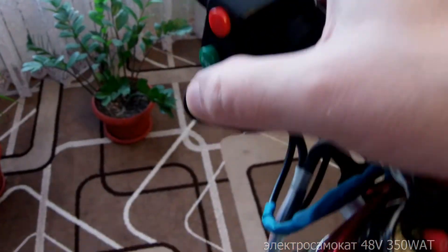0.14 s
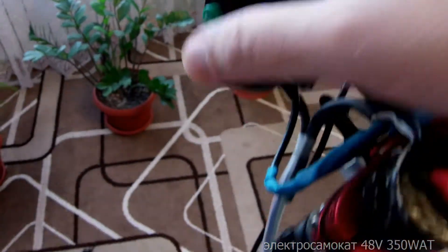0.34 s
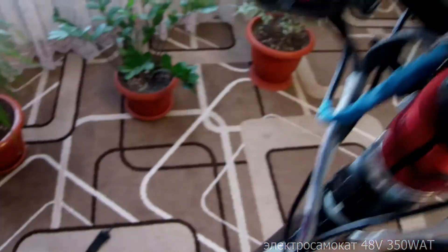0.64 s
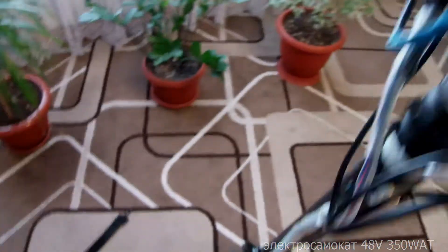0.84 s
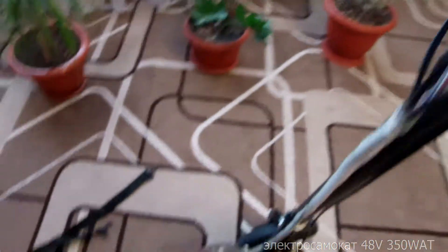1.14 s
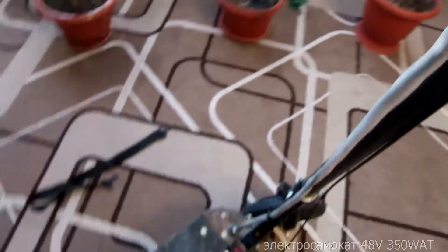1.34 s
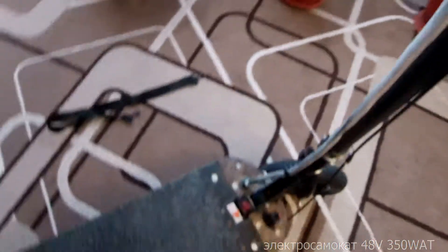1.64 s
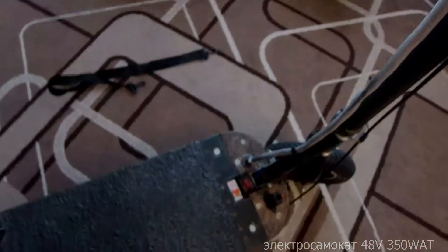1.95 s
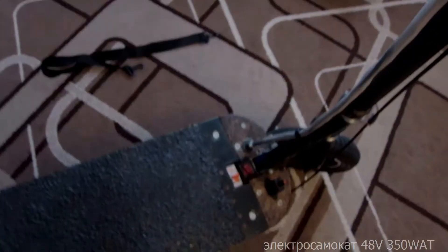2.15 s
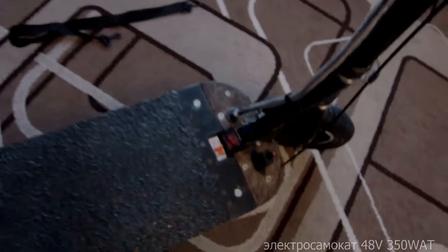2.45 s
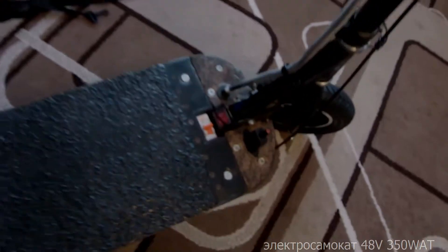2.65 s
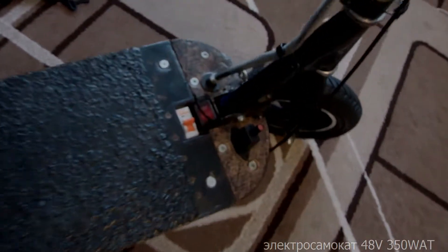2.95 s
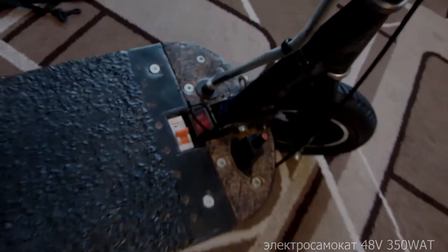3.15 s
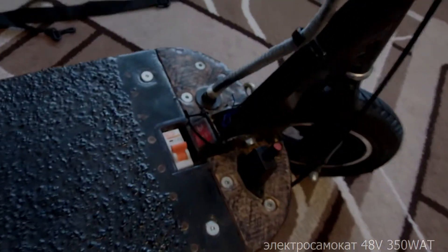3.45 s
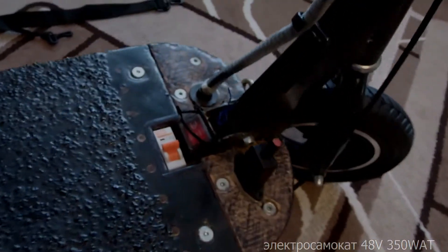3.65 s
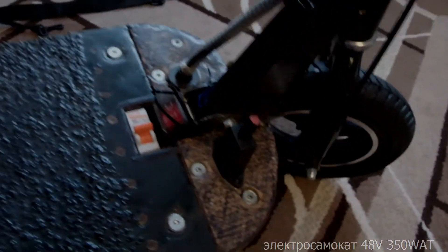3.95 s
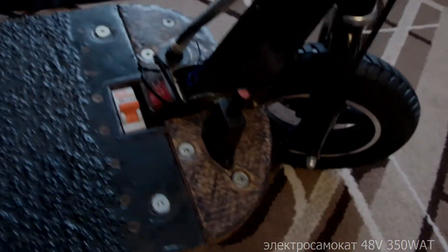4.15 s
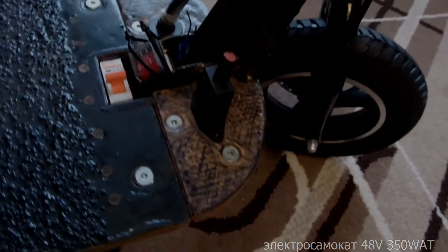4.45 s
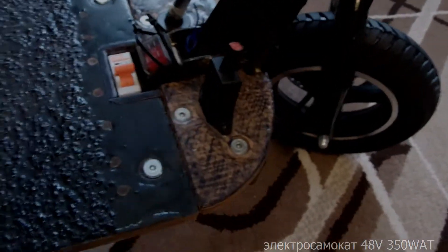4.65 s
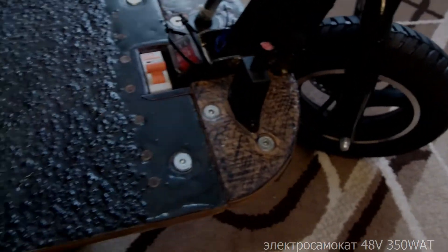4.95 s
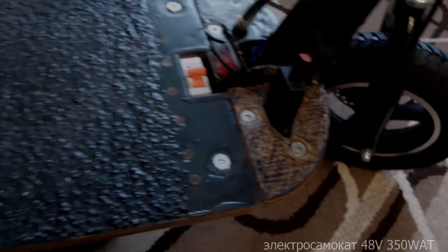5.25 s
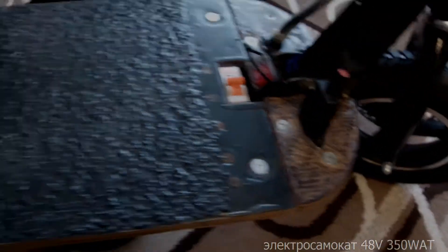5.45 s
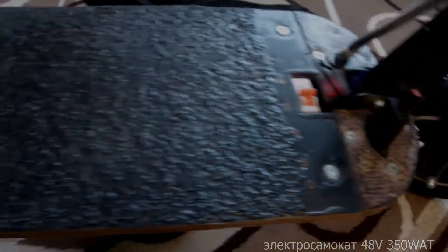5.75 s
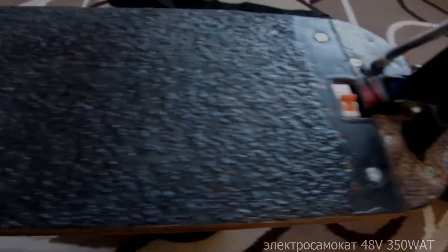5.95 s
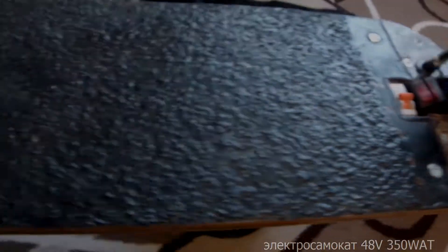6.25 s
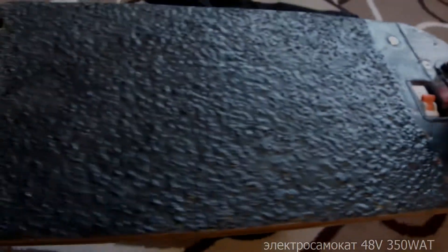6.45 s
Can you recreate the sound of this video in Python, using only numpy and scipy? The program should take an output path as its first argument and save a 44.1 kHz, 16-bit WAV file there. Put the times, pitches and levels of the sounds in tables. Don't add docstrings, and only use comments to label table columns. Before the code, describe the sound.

A small electric scooter motor rubs and squeaks in four short jerks, then catches and whirs with a rough, pulsing, bright chatter in a room.

```python
import sys
import numpy as np
from scipy import signal
from scipy.fft import rfft, irfft, next_fast_len
from scipy.io import wavfile
from scipy.ndimage import uniform_filter1d

SR = 44100
rng = np.random.default_rng(int(sys.argv[2]) if len(sys.argv) > 2 else 0)


def master_out(mix):
    frames = np.transpose(np.atleast_2d(mix))
    ceiling = np.clip(frames, -1, 1)
    pcm = np.round(ceiling * 32767).astype(np.int16)
    wavfile.write(sys.argv[1], SR, pcm)


def nominal_scale(level):
    x = np.asarray(level, float) / 20
    return 10 ** x


N = 291677

# (start [s], commutation at start [Hz], at top [Hz], coasting afterwards [0-1])
PUSHES = [(.8, 69, 79.3, .3), (1.11, 80, 92.6, .44), (1.5, 86.4, 96.3, 0), (1.65, 75.2, 98.6, .6),
          (2.22, 88.35, 102.9, .8), (2.72, 87.57, 100, .9), (3.33, 88, 98.2, 0), (3.49, 76, 95, .7),
          (4.02, 86.74, 103, .9), (4.57, 87.1, 101, .9), (5.16, 87.1, 100.2, 0), (5.31, 75.93, 95.96, .55),
          (5.86, 87, 100.3, .5), (6.38, 86.8, 100.2, .3)]
PUSH_EFFORT = [0.27, 0.64, 0.78, 0.98, 0.74, 1.3, 0.19, 1, 0.85, 1.6, 0.34, .9, 1.1, 1.9]
PUSH_S, PUSH_S_PER_HZ = 0.1, 0.0026
SAG_HZ_PER_S, IDLE_HZ, TAKE_UP_S = 46, 85, 0.03
IDLE_COASTING = 0.8
EFFORT_RISE_S, EFFORT_FALL_S = 0.044, 0.018

# (time [s], level [dB], brush end in sight [dB])
NEARNESS = [(.82, -57.5, -12.5), (.87, -57.5, -9.5), (1.02, -58.5, -8), (1.18, -53.5, -8.5),
            (1.4, -54.5, -8.5), (1.5, -59, -8), (1.62, -52.5, -9.5), (2.1, -53, -7.5), (2.5, -51.5, -6),
            (3.37, -51, -7), (3.45, -48.5, -8), (4.3, -46.5, -8), (4.8, -48, -7.5), (5.2, -48, -8.5),
            (5.35, -46.5, -9.5), (5.95, -50, -11.5), (6.15, -51, -11.5), (6.61, -53, -12)]
# (time [s], facing [0-1])
FACING = [
    (.6, 0.22),
    (1.6, 0.26),
    (2.6, 0.18),
    (3.4, 0.37),
    (4.0, 1),
    (4.6, 0.98),
    (5.2, 0.74),
    (5.7, 0.61),
    (6.6, 0.02),
]
UNREST_DB, UNREST_PER_S = 0.7, 6

# (centre [Hz], width [Hz], level [dB per Hz], gain when faced [dB])
FRAME_MODES = [(578, 57, -6.5, -4), (644.2, 44, -3, 2.5), (721.4, 51, 0.5, 3), (764.6, 65, -8, -1),
               (844, 117, -8.5, -5), (914, 126, -13, 3), (1159, 120, -18, 0.5), (1278, 144, -15.5, -1.2)]
CASE_MODES = [(1630, 105, -5, 0.5), (1792, 114, -2.5, -1.5), (2080, 177, 0.5, -1.7), (2234, 98, 3, 7.5),
              (2408, 280, -7.5, -1), (2565, 51, -3, 8), (2943, 223, -5, 2.5), (3144, 58, -24, -1)]
COVER_MODES = [(3480, 160, -15, -13), (3760, 90, 1, -2), (3970, 98, -3.5, -3), (4550, 210, -7.5, -12),
               (4960, 240, -9, 8), (5360, 190, -10, 6), (6360, 350, -4, -2)]
SHAFT_MODES = [(4307, 110, -0.5, 7), (4412, 156, 2.5, -4.5)]
BRUSH_MODES = [(6930, 160, -10.5, 15.5), (6800, 160, -9, -7), (7250, 213, 0.5, -0.8), (7820, 380, -4.5, -5),
               (8076, 136, -3.5, -9), (8050, 420, -11, 3.5), (8860, 220, -9.5, 7), (8960, 160, -11.5, -6),
               (9700, 500, -59, 3), (13100, 1000, -36, 12), (8520, 200, -21.5, 14)]
# (level re whir [dB], share of the sight change [dB/dB], gain under a push [dB])
FRAME_MIX = (-5, -.1, 1.4)
CASE_MIX = (-7, -0.44, 1.2)
COVER_MIX = (-12, 0.69, 1.8)
SHAFT_MIX = (-2.6, 1.97, 0.81)
BRUSH_MIX = (0.13, 0.94, 1.04)
FRAME_LAG_DB, FRAME_JOINS_S = -7, 0.35
# (time [s], extra level [dB])
JOLTS = [
    (1.4, 10),
    (3.066, 8),
    (3.42, 2),
    (4.845, 7),
    (4.884, 7.5),
    (5.236, 5),
    (6.15, 1),
    (6.51, -2),
]
JOLT_RISE_S, JOLT_FALL_S = 0.002, 0.018

SWITCHING_HZ = 5880
WHINE = {-5: -19, -4: -22, -3: -16, -2: -16, -1: -14, 1: -6, 2: -7, 3: -8, 4: -12, 5: -11}
OCTAVE_WHINE = {-3: -44, -2: -45, 1: -43, 2: -41, 3: -40}

# (start [s], hold [s], strength [dB], extra squeak [dB])
JERKS = [
    (-.03, .07, 0.3, 0.1),
    (0.116, 0.07, -0.1, 0),
    (0.261, 0.049, 1.5, -1.5),
    (0.376, 0.095, 2, 3.5),
]
# (begins [s], fully running [s])
CATCH_S = (0.775, 0.832)
JERK_ATTACK_S, JERK_RELEASE_S = 0.024, 0.055
SQUEAK_RINGS_S = 0.11
# (centre [Hz], width [Hz], level [dB per Hz], gain when faced [dB])
RUB_LOW_MODES = [(705, 170, -7.5, 0), (943, 67, -2, 0), (1267, 17, -0.5, 0), (1414, 71, -6, 0)]
SQUEAK_MODES = [(2016, 200, -8, 0), (2114, 180, -4.5, 0), (2208, 140, -1.5, 0)]
RUB_MID_MODES = [(1670, 130, -1, 0), (2470, 100, -3.5, 0), (2684, 36, 0, 0), (2930, 280, -8, 0),
                 (3083, 98, -5.5, 0), (3640, 250, -14, 0), (4370, 100, -8, 0), (4830, 170, -17, 0)]
RUB_HIGH_MODES = [(6960, 190, -6, 0), (7340, 300, -3.5, 0), (8050, 380, -5.5, 0), (8550, 320, -14, 0),
                  (9000, 280, -16, 0)]
# (level in a jerk [dB], sag in the hold [dB/s], level at rest [dB], fade after the last [dB/s])
LOW_RUB = (-60.5, 40, -69.5, 70)
SQUEAK_RUB = (-58.5, 9, -64.5, 17)
MID_RUB = (-59, 12, -66.5, 10)
HIGH_RUB = (-60.5, 35, -69.5, 8)

# (delay [ms], level [dB])
DECK_ECHO = (2.7, -9.5)
# (delay [ms], level [dB], change of delay as the microphone swings round [ms])
WALLS = [(8.458, -13.5, 0.595), (11.21, -15, 0.263), (16.205, -20.5, -0.733), (17.43, -13, 0.42),
         (21.68, -14.5, 1.104), (25.81, -14, -0.827)]
WALL_CUT_HZ = 4700

# (frequency [Hz], level [dB per Hz])
HISS = [(15, 2.5), (60, -3.5), (120, -7.5), (250, -12), (450, -15), (1500, -18), (5500, -27),
        (10000, -35.5), (12000, -32.5), (15000, -31.5)]
# (frequency [Hz], level [dB])
SUPPLY = [(14225, -103), (14275, -101), (14325, -100), (14375, -93), (14400, -102), (14425, -90),
          (14475, -96), (14525, -98), (14575, -102)]
HISS_DB, OFFSET, CUTOFF_HZ = -63.5, 0.00081, 15020


def motor():
    step_hz, coasting, effort = hunting()
    frame_db, case_db, cover_db, shaft_db, brush_db = part_levels(effort)
    turn = 2 * np.pi * np.cumsum(step_hz) / SR
    throb = coasting * np.cos(turn)
    double = (1 - 0.43 * coasting) * np.cos(2 * turn + 0.45 * drift(39))
    rough = drift(79)

    def gate(throb_db, double_db, rough_db):
        bunched = nominal_scale(throb_db * throb + double_db * double + rough_db * rough)
        return bunched / np.sqrt(uniform_filter1d(bunched ** 2, size=2000))

    frame = nominal_scale(frame_db) * body(chatter(gate(4.3, 6.5, 0.91), 1.62), FRAME_MODES, 1.0)
    case = nominal_scale(case_db) * body(chatter(gate(5.6, 5.2, 1.0), 0.61), CASE_MODES, 1.0)

    rattle = chatter(gate(7.6, 4.8, 0.8), 2.1)
    cover = body(rattle, COVER_MODES, 1.0) + whine(turn, coasting, SWITCHING_HZ, WHINE, 2.2)
    shaft = nominal_scale(shaft_db) * body(rattle[::-1], SHAFT_MODES, 1.6)

    brush = body(chatter(gate(6.7, 5.9, 0.86), 0.54), BRUSH_MODES, 0.73)
    brush = brush + whine(turn, coasting, 2 * SWITCHING_HZ, OCTAVE_WHINE, 3.0)

    running = np.interp(np.arange(N) / SR, CATCH_S, [0, 1])
    upper = deck(case + shaft + nominal_scale(cover_db) * cover)
    return running * (frame + upper + nominal_scale(brush_db) * brush)


def hunting():
    speed, work = [], []
    next_starts = [row[0] for row in PUSHES[1:]] + [N / SR + 1]
    for (s, start_hz, top_hz, coasting), effort, next_s in zip(PUSHES, PUSH_EFFORT, next_starts):
        latest_s = next_s - TAKE_UP_S
        top_s = min(s + PUSH_S + PUSH_S_PER_HZ * (top_hz - start_hz), latest_s)
        sag_s = min((top_hz - IDLE_HZ) / SAG_HZ_PER_S, latest_s - top_s)
        speed += [(s, start_hz, 0), (top_s, top_hz, coasting)]
        if sag_s > 0.01:
            speed += [(top_s + sag_s, top_hz - SAG_HZ_PER_S * sag_s, IDLE_COASTING * coasting)]
        work += [(s, 0), (s + EFFORT_RISE_S, effort)]
        work += [(top_s, effort), (min(top_s + EFFORT_FALL_S, next_s), 0)]
    return in_time(speed) + in_time(work)


def part_levels(effort):
    level_db, sight_db = in_time(NEARNESS)
    now = np.arange(N) / SR
    joining = FRAME_LAG_DB * np.exp(-np.maximum(now - CATCH_S[1], 0) / FRAME_JOINS_S)
    jolted = sum(np.interp(now, [s - JOLT_RISE_S, s, s + JOLT_FALL_S], [0, db, 0]) for s, db in JOLTS)
    level_db = level_db + UNREST_DB * drift(UNREST_PER_S)
    mixes = (FRAME_MIX, CASE_MIX, COVER_MIX, SHAFT_MIX, BRUSH_MIX)
    frame, *others = [level_db + db + share * sight_db + push_db * (effort - 0.5)
                      for db, share, push_db in mixes]
    return frame + joining + jolted, *others


def chatter(gate, grain_db):
    sizes = nominal_scale(grain_db * np.minimum(rng.exponential(1, (3, N)), 5))
    return gate * sizes * rng.standard_normal((3, N))


def body(contacts, modes, patchy_db):
    out = 0
    (facing,) = in_time(FACING)
    for k, (hz, width, level_db, faced_db) in enumerate(modes):
        gain = nominal_scale(level_db + faced_db * (facing - 0.5) + patchy_db * drift(2.9))
        out = out + gain * resonate(contacts[k % 3], hz, width)
    return rms_one(out)


def resonate(x, hz, width):
    r = np.exp(-np.pi * 1.5 * width / SR)
    section = [(1 - r * r) / 2, 0, (r * r - 1) / 2, 1, -2 * r * np.cos(2 * np.pi * hz / SR), r * r]
    return signal.sosfilt([section, section], x)


def whine(turn, coasting, centre_hz, sidebands, flicker_db):
    carrier = 2 * np.pi * centre_hz * np.arange(N) / SR
    fades_db = {1: -14 * (1 - coasting), 3: -2 * coasting}
    out = 0
    for k, db in sidebands.items():
        fade_db = fades_db.get(abs(k), -11 * coasting)
        out = out + nominal_scale(db + fade_db + flicker_db * drift(4)) * np.sin(carrier + k * turn)
    return out


def jerks():
    contacts = chatter(nominal_scale(0.48 * drift(70)), 3.5)
    low = nominal_scale(rub_level(LOW_RUB)) * body(contacts, RUB_LOW_MODES, 2.0)
    squeak = nominal_scale(rub_level(SQUEAK_RUB, squeaks=True)) * body(contacts, SQUEAK_MODES, 0.48)
    middle = nominal_scale(rub_level(MID_RUB)) * body(contacts, RUB_MID_MODES, 0.8)
    high = nominal_scale(rub_level(HIGH_RUB)) * body(contacts, RUB_HIGH_MODES, 0.66)
    not_yet_running = np.interp(np.arange(N) / SR, CATCH_S, [1, 0])
    return not_yet_running * (low + deck(squeak + middle) + high)


def rub_level(part, squeaks=False):
    jerk_db, sag_db, rest_db, fade_db = part
    rows = []
    for s, hold_s, db, squeak_db in JERKS:
        top_db = jerk_db + db + squeaks * squeak_db
        held_s = s + JERK_ATTACK_S + hold_s
        rows += [(s, rest_db), (s + JERK_ATTACK_S, top_db), (held_s, top_db - sag_db * hold_s)]
    end_s = held_s + JERK_RELEASE_S
    rows += [(end_s, rest_db + squeaks * squeak_db)]
    rows += [(end_s + SQUEAK_RINGS_S, rest_db - fade_db * SQUEAK_RINGS_S), (end_s + 1, rest_db - fade_db)]
    return in_time(rows)[0]


def deck(x):
    delay_ms, echo_db = DECK_ECHO
    lag = round(delay_ms * SR / 1000)
    return x - nominal_scale(echo_db) * np.pad(x, (lag, 0))[:N]


def room(x):
    (facing,) = in_time(FACING)
    now = np.arange(N)
    dull = signal.lfilter(*signal.butter(1, WALL_CUT_HZ, fs=SR), x)
    out = x
    for delay_ms, db, swing_ms in WALLS:
        lag = (delay_ms + swing_ms * facing) * SR / 1000
        out = out + nominal_scale(db) * np.interp(now - lag, now, dull)
    return out


def hiss():
    size = next_fast_len(N)
    hz = np.maximum(np.arange(size // 2 + 1) * SR / size, 1)
    shape_hz, shape_db = np.transpose(HISS)
    shape = nominal_scale(np.interp(np.log(hz), np.log(shape_hz), shape_db)) * (hz > 8)
    noise = rms_one(irfft(rfft(rng.standard_normal(size)) * shape, size)[:N])
    lines = 0
    for line_hz, db in SUPPLY:
        phase = 2 * np.pi * line_hz * np.arange(N) / SR + 7 * rng.random()
        lines = lines + nominal_scale(db) * np.sqrt(2) * np.sin(phase)
    return nominal_scale(HISS_DB) * noise + lines


def rms_one(x):
    return x / np.sqrt(np.mean(x ** 2) + 1e-20)


def in_time(rows):
    s, *columns = np.transpose(rows)
    return [np.interp(np.arange(N) / SR, s, c) for c in columns]


def drift(rate):
    r = np.exp(-80 * np.pi * rate / SR)
    slow = signal.lfilter([1], [1, -2 * r, r * r], rng.standard_normal(N // 40 + 2002))[2000:]
    return np.interp(np.arange(N) / 40, np.arange(len(slow)), rms_one(slow))


def scene():
    return (room(jerks() + motor()) + hiss())[None]


def low_pass(x):
    return signal.sosfilt(signal.butter(12, 15140, fs=SR, output="sos"), x)


def record(dry):
    steep = signal.ellip(14, 0.3, 60, CUTOFF_HZ, fs=SR, output="sos")
    mix = signal.sosfilt(steep, dry) + OFFSET
    return low_pass(mix)


dry = scene()
out = record(dry)
master_out(out)
```